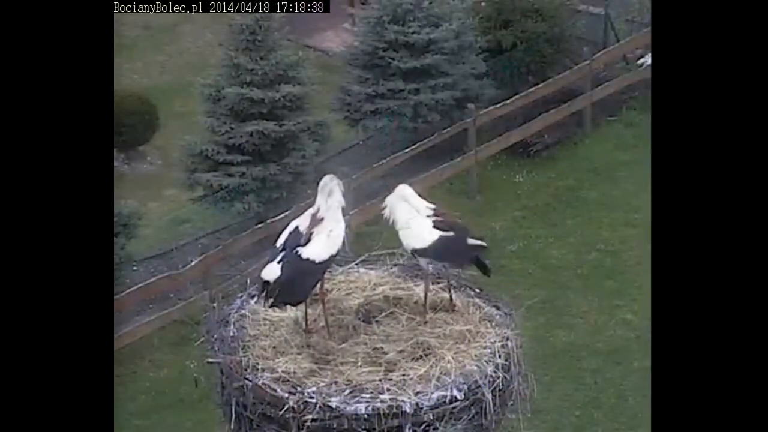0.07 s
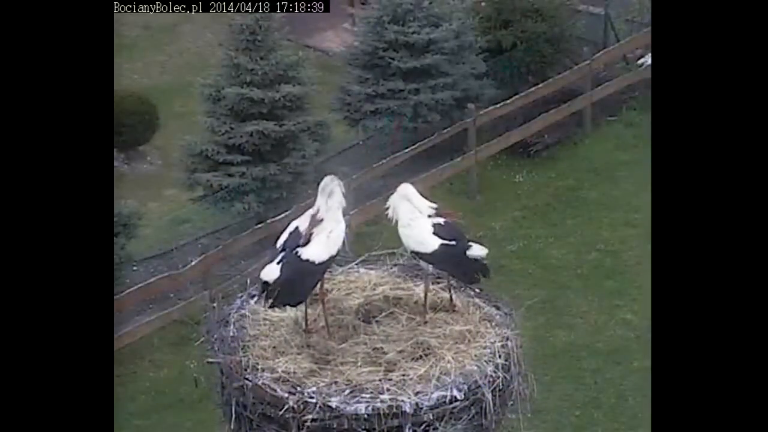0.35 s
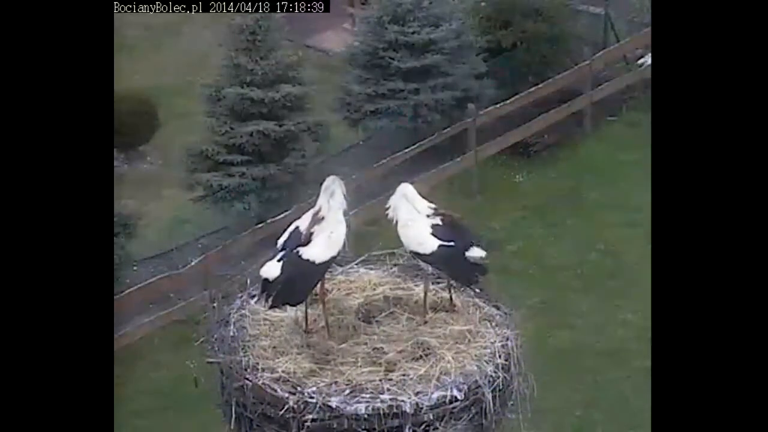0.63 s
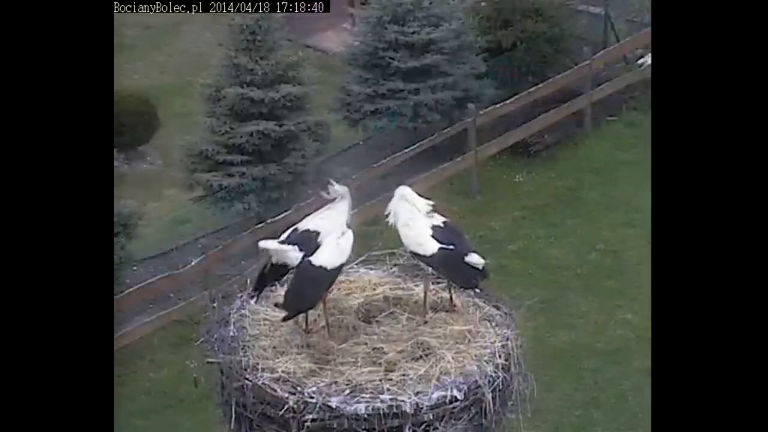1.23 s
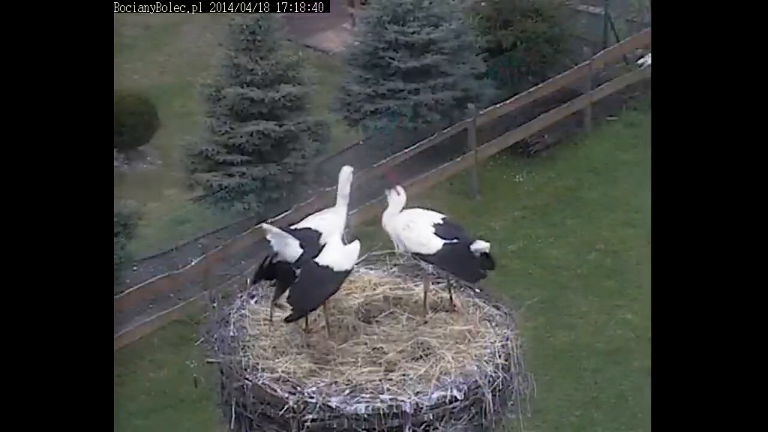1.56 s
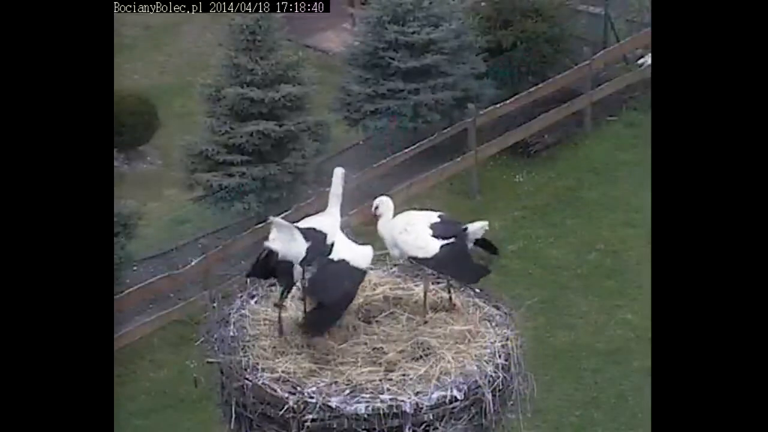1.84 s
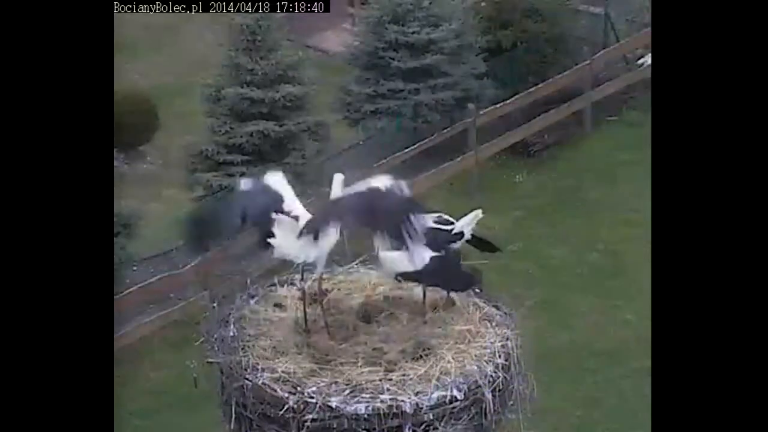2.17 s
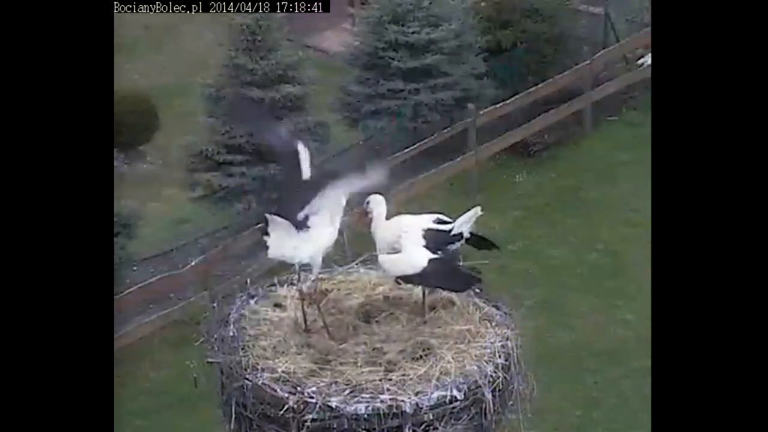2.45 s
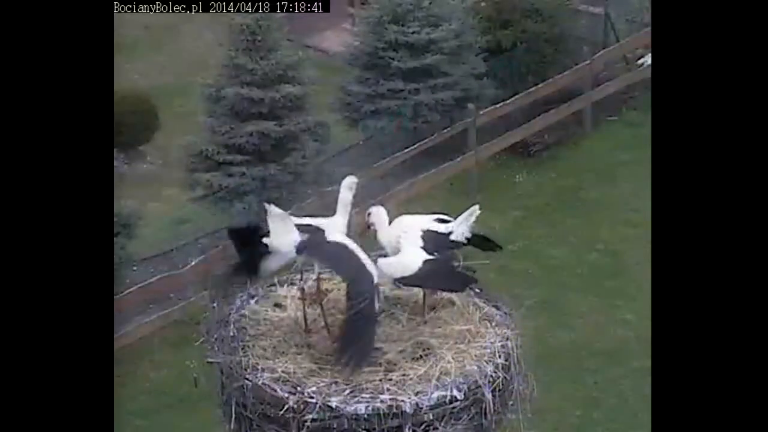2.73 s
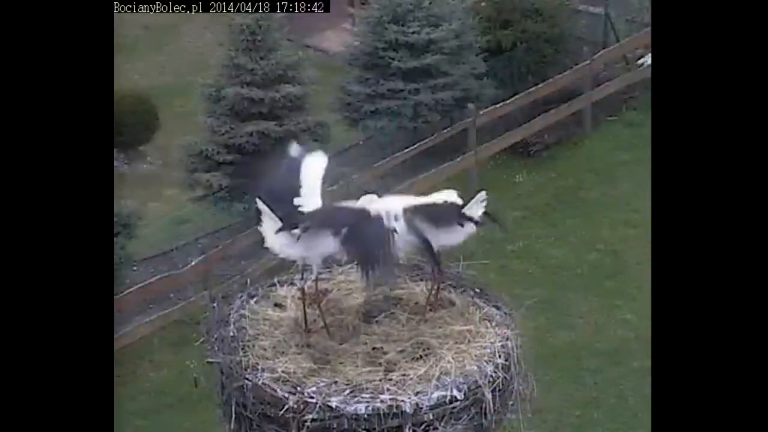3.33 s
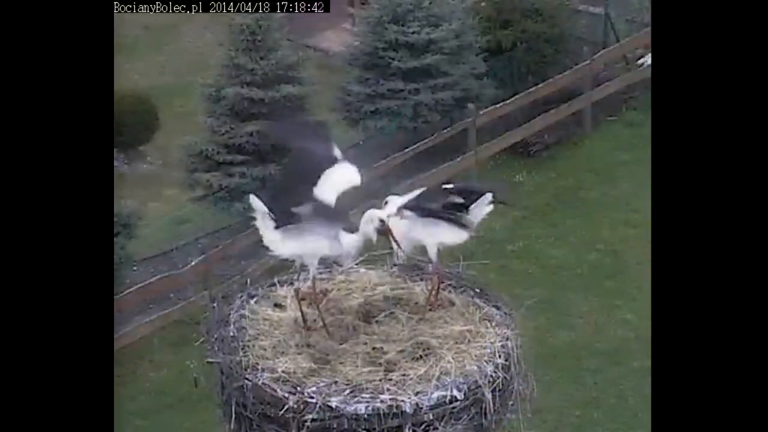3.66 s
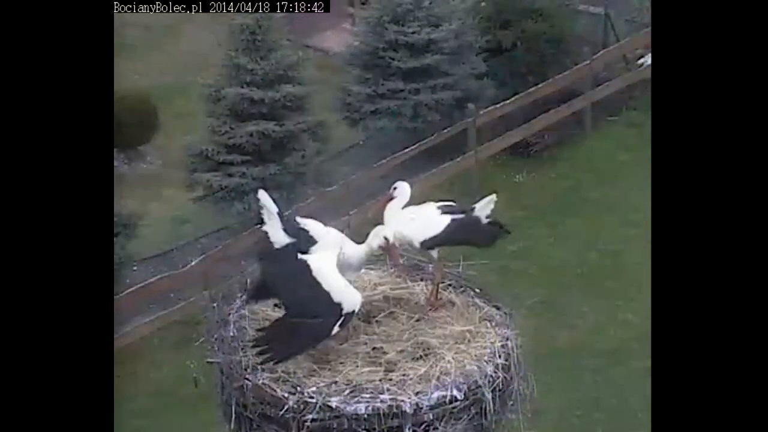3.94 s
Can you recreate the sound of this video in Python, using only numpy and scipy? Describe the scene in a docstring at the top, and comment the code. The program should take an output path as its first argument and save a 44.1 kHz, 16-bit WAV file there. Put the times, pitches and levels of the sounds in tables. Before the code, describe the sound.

A stork clatters its bill in a quick, even run of dry clacks.

```python
"""A stork nest above a garden, heard almost in mono from a fixed outdoor camera close by.
Two storks greet each other; each clack is a crack of the bill edges and a ring of bill and throat pouch.
One clatters loudly, slowing a little, first with its head thrown back, then forward, where the clacks
ring hollower. Its mate clatters faintly, then slows to single snaps. Wings beat twice, with rustling
feathers and puffs of air. The camera adds hum and hiss."""
import sys
import numpy as np
from scipy import signal
from scipy.fft import rfft, irfft
from scipy.io import wavfile
from scipy.ndimage import uniform_filter1d

SR = 44100
rng = np.random.default_rng(int(sys.argv[2]) if len(sys.argv) > 2 else 0)


def wav_record(signal):
    """Record a signal, one row per channel, as 16-bit PCM in the file named by sys.argv[1]."""
    frames = np.transpose(np.atleast_2d(signal))
    bounded = np.clip(frames, -1, 1)
    # unit amplitude maps onto the largest positive 16-bit level
    quanta = np.round(bounded * 32767).astype(np.int16)
    wavfile.write(sys.argv[1], SR, quanta)


N = 176400
LEAD_IN_S = 0.003  # room ahead of each clack's first contact


def leading_stork():
    """The loud bird: a long clatter, its neck snapping forward about halfway."""
    # Each row: start in seconds, relative level in dB, main resonance in Hz, crack against ring in dB.
    clacks = [(0.0552, -26, 2516, -16), (0.1508, -25.5, 2550, -11), (0.2498, -25, 2590, -15),
              (0.3513, -24.5, 2500, -5.5), (0.4562, -24.5, 2596, -9), (0.5593, -24.8, 2550, -15.5),
              (0.6643, -25, 2550, -9.5), (0.7699, -24, 2546, -18), (0.8761, -24, 2480, -12.5),
              (0.9845, -25, 2475, -12.5), (1.0957, -24.8, 2490, -2), (1.2053, -21.5, 2620, -10.5),
              (1.3177, -22, 2510, -9), (1.431, -23, 2640, -6), (1.5487, -22, 2510, -5),
              (1.6658, -19.5, 2590, -2), (1.785, -23.5, 2430, 2.5), (1.9146, -25.2, 2290, -0.5),
              (2.0298, -19.5, 2280, -6), (2.149, -15, 2270, -6.5), (2.2678, -15, 2316, -5.5),
              (2.3854, -15, 2300, -8), (2.5026, -16, 2247, -6.5), (2.6222, -16.5, 2280, -6.5),
              (2.7408, -15, 2283, -6.5), (2.8603, -15.5, 2310, -8), (2.9791, -18, 2280, -5),
              (3.0986, -18.5, 2290, -6.5), (3.2131, -15.7, 2300, -9.5), (3.3332, -13.5, 2314, -13),
              (3.4519, -16.0, 2306, -12.5), (3.569, -18, 2266, -11.5), (3.6896, -17.5, 2295, -7.5),
              (3.808, -17.5, 2255, -11), (3.9265, -20, 2170, -6)]
    # Modes of bill and throat pouch, head back and head forward.
    # Each row: frequency before tuning in Hz, relative level in dB, rise and 60 dB decay in seconds.
    back = [(803, -19.5, 0.00029, 0.014), (1669, -6.5, 0.00041, 0.013), (2427, 1.5, 0.0004, 0.0086),
            (2650, -6, 0.0021, 0.0082), (3245, -21, 0.00071, 0.013), (5090, -25, 0.0003, 0.011),
            (5565, -5, 0.00061, 0.0094), (6386, -15.5, 0.00035, 0.0086), (9710, -34.5, 0.00032, 0.0059),
            (10540, -45, 0.0004, 0.011)]
    forward = [(746, -26.5, 0.0027, 0.027), (1770, -10.5, 0.00017, 0.0034), (2035, 0, 0.0014, 0.005),
               (2267, 4.5, 0.0007, 0.012), (3143, -18.5, 0.0014, 0.012), (3930, -30.5, 0.0011, 0.018),
               (5050, -33.5, .0008, 0.015), (5783, -4, 0.001, 0.014), (6420, -24, 0.0019, 0.012),
               (10230, -39.5, 0.00042, 0.014)]
    return clatter(clacks, back, forward, swing_s=(1.83, 1.84), gain_db=-16)


def mate():
    """The faint bird: its clatter slows to single snaps as the neck eases forward."""
    # Each row: start in seconds, relative level in dB.
    snaps = [(0.012, -47), (0.1074, -47), (0.201, -44), (0.2956, -44), (0.3904, -44), (0.4875, -44.5),
             (0.5826, -46), (0.6759, -44), (0.8674, -45.5), (0.965, -46.5), (1.0645, -45), (1.166, -45),
             (1.2676, -43.5), (1.3708, -45), (1.479, -49), (1.6062, -50), (1.7397, -46), (2.0233, -41.5),
             (2.1724, -40), (2.3183, -34.5), (2.362, -64), (2.4682, -36.5), (2.615, -35), (2.7593, -33),
             (2.9023, -30.5), (3.0449, -30.5), (3.1938, -34)]
    # Modes of bill and throat pouch, head back and head forward.
    # Each row: frequency before tuning in Hz, relative level in dB, rise and 60 dB decay in seconds.
    back = [(983, -2, 0.00028, 0.011), (1740, 7.5, 0.0011, 0.0095), (2420, -10.5, 0.00014, 0.0047),
            (5280, -10, .0003, 0.0089), (6280, -8.5, 0.00018, 0.013)]
    forward = [(932, -19.5, 0.00026, 0.018), (2320, -5, 0.0014, 0.0065), (2450, 9, 0.003, 0.0086),
               (3270, -8, 0.0002, 0.0071), (5510, -3, 0.00093, 0.0071), (10300, -39.5, 0.00047, 0.0071)]
    pitch_hz, crack_db = 2403, -5
    clacks = [(start, db, pitch_hz, crack_db) for start, db in snaps]
    return clatter(clacks, back, forward, swing_s=(0.59, 2.6), gain_db=-11)


def clatter(clacks, back, forward, swing_s, gain_db):
    """A run of clacks whose timbre follows the neck's swing from thrown back to forward."""
    # Overall tone of the clacks: little bass, dips around 7-9 kHz, a peak near 10 kHz.
    # Each row: frequency in Hz, gain in dB.
    overall_tone = [(100, -32.5), (400, -9.5), (700, 3.5), (1250, -3.5), (1700, 1.5), (6350, -1),
                    (6750, -14.5), (7400, -7), (8200, -22), (9300, -13.5), (9700, -1.5), (10500, 3.5),
                    (10900, -16.5)]
    out = np.zeros(N)
    for start, db, pitch_hz, crack_db in clacks:
        ahead = np.interp(start, swing_s, [0, 1])
        head_back = clack(back, pitch_hz, crack_db, choke=2.42)
        head_forward = clack(forward, pitch_hz, crack_db, choke=1.8)
        blend = unit((1 - ahead) * head_back + ahead * head_forward)
        add(out, start - LEAD_IN_S, amp(db + gain_db) * blend)
    return colour(out, overall_tone)


def clack(modes, pitch_hz, crack_db, choke):
    """Bill and pouch ring for milliseconds over a crack; with choke above 1 they die ever faster."""
    glide, glide_s = 0.14, 0.00073  # the resonances rise as the bill shuts
    clock = np.arange(-LEAD_IN_S, 0.04, 1 / SR)
    t = np.maximum(clock, 0)
    glided_time = t + glide * glide_s * (np.exp(-t / glide_s) - 1)
    main_hz = max(modes, key=lambda mode: mode[1])[0]
    ring = np.zeros(len(t))
    for hz, db, rise, t60 in modes:
        stray_db, detune = rng.standard_normal(2) * (0.7, 0.004)
        attack = 1 - np.exp(-(t / rise) ** 2)
        decay = np.exp(-np.log(1000) * (t / t60) ** choke)
        if abs(np.log(hz / pitch_hz)) < np.log(5 / 4):  # modes near the clack's pitch follow it
            hz *= pitch_hz / main_hz
        tone = np.sin(2 * np.pi * hz * (1 + detune) * glided_time)
        ring += amp(db + stray_db) * attack * decay * tone
    return unit(unit(ring) + amp(crack_db) * edge_crack(clock))


def edge_crack(clock):
    """The bill edges touch, then meet fully, with a rough scrape."""
    # The dry crack's spectrum. Each row: frequency in Hz, gain in dB.
    spectrum = [(150, -34), (450, -16.5), (800, -1.5), (1250, -10), (1800, 7.5), (2600, 6.5), (3300, -4.5),
                (4100, -12.5), (5000, -4), (6100, 3), (6800, -17), (7400, -20), (8300, -35), (11000, -34)]
    gap_s, scrape_s = 0.001111, 0.002
    t = np.maximum(clock, 0)
    contacts = amp(-4) * np.sinc(clock * SR) + np.sinc((clock - gap_s) * SR)
    scrape = rng.standard_normal(len(t)) * t * np.exp(-2 * t / scrape_s)
    return unit(colour(unit(contacts) + amp(6) * unit(scrape), spectrum))


def diffuse_tail(x, db, t60):
    """A short, noisy decay that follows each clack."""
    # The tail's spectrum. Each row: frequency in Hz, gain in dB.
    spectrum = [(200, -10.5), (800, -16), (1700, -11), (2500, -2), (4000, 9.5), (5600, -4.5), (8000, -28.5),
                (11000, -21)]
    t = np.arange(SR // 2) / SR
    build_up = np.minimum(t / 0.0057, 1)
    tail = noise(spectrum, size=len(t)) * np.exp(-np.log(1000) * t / t60) * build_up
    return amp(db) * signal.fftconvolve(x, tail / np.linalg.norm(tail))[:N]


def wings():
    """Feathers rustle over soft puffs of air pushed by the wings."""
    # Feather swishes and air puffs. Each row: centre in seconds, width in seconds, level in dB.
    swishes = [(2.215, 0.015, -52), (2.285, 0.023, -54.5), (2.366, 0.0045, -43), (2.845, 0.0089, -49),
               (2.91, 0.013, -44), (2.97, 0.029, -56), (3.055, 0.018, -52.5)]
    puffs = [(2.26, 0.077, -54), (2.89, 0.055, -53), (3.335, .012, -55), (3.41, 0.011, -52)]
    # Their spectra. Each row: frequency in Hz, relative density in dB.
    feathers = [(80, -19), (200, -6), (450, 3.5), (700, 2.5), (900, 6.5), (1200, -10.5), (1700, 0),
                (2500, -5.5), (3500, -36), (4600, -32), (5700, -10), (7200, -27), (9500, -43.5),
                (11000, -65)]
    air = [(30, -7.5), (80, 4.5), (170, -0.5), (300, -6), (600, -27), (1500, -43), (8000, -96)]
    grain = unit(uniform_filter1d(rng.standard_normal(N), int(0.002 * SR)))  # 2 ms grains
    roughness = np.exp(0.4 * np.minimum(grain, 2))
    rustle = unit(colour(rng.standard_normal(N) * roughness, feathers))
    return rustle * swells(swishes) + noise(air) * swells(puffs)


def mains_hum():
    """The camera's mains hum: 50 Hz and its odd harmonics."""
    # Each row: frequency in Hz, rms level in dB.
    harmonics = [(50, -51.5), (150, -60), (250, -73), (350, -76), (450, -75)]
    t = np.arange(N) / SR
    return sum(amp(db) * np.sqrt(2) * np.sin(2 * np.pi * (hz * t + rng.random())) for hz, db in harmonics)


def hiss():
    """The camera's hiss, common to both channels and slightly patchy in time and frequency."""
    # Each row: frequency in Hz, relative density in dB.
    spectrum = [(10, 9.5), (30, -13.5), (70, 4), (120, -1.5), (220, -3.5), (400, -6.5), (800, -12.5),
                (1200, -13), (1800, -14), (2500, -7.5), (3300, -23), (4300, -28), (5000, -22.5),
                (5650, -16), (6300, -29.5), (6800, -26), (8300, -47.5), (10500, -51), (12000, -69)]
    level_db, patch_db = -59, 1.4
    bands = signal.stft(noise(spectrum), nperseg=512)[2]
    patches = uniform_filter1d(rng.standard_normal(bands.shape), size=10, axis=0, mode="wrap")
    patches = unit(uniform_filter1d(patches, size=7, axis=1))
    patchy = signal.istft(bands * amp(patch_db * patches), nperseg=512)[1][:N]
    return amp(level_db) * unit(patchy)


def side_hiss():
    """Faint noise that gives the background a little width."""
    # Each row: frequency in Hz, relative density in dB.
    spectrum = [(30, 16), (150, 5.5), (400, -15.5), (1500, -27), (2500, -19), (4000, -33.5), (5500, -20.5),
                (7500, -44.5), (11000, -52.5)]
    return amp(-63) * noise(spectrum)


def swells(rows):
    """A bell-shaped rise and fall in level for each wing movement."""
    t = np.arange(N) / SR
    return sum(amp(db) * np.exp(-0.5 * ((t - centre) / width) ** 2) for centre, width, db in rows)


def amp(db):
    """Decibels to gain."""
    return 10 ** (np.asarray(db) / 20)


def unit(x):
    """Scales to an rms of one."""
    return x / np.sqrt(np.mean(x ** 2) + 1e-20)


def add(mix, start_s, sound):
    """Mixes a sound in at a time."""
    part = mix[max(round(start_s * SR), 0):][:len(sound)]
    part += sound[:len(part)]


def colour(x, points):
    """Filters by a curve through points of frequency in Hz and gain in dB."""
    hz, db = np.transpose(points)
    f = np.fft.rfftfreq(len(x), 1 / SR)
    return irfft(rfft(x) * amp(np.interp(np.log(f + 1), np.log(hz), db)), len(x))


def noise(points, size=N):
    """Coloured noise with an rms of one."""
    return unit(colour(rng.standard_normal(size), points))


def scene():
    """Both birds close and central, with a faint, noisy stereo smear after each clack."""
    bills = leading_stork() + mate()
    near = diffuse_tail(bills, db=-18, t60=0.026)  # near and far: scatter from nest, trees and fence
    far = diffuse_tail(bills, db=-30.5, t60=0.12)
    mid = bills + near + far + wings() + mains_hum() + hiss()
    side = side_hiss() + diffuse_tail(bills, db=-43, t60=0.07)  # the stereo smear
    return np.array([mid * amp(-0.03) + side, mid - side])


def record(dry):
    """The camera's band limit and the constant offset of each input channel."""
    edge_hz, offsets = 10900, np.array([[0.0391], [0.0378]])
    lowpass = signal.firwin(511, edge_hz, window=("kaiser", 9), fs=SR)
    return signal.oaconvolve(dry, lowpass[None], "same") + offsets


dry = scene()
out = record(dry)
wav_record(out)
```